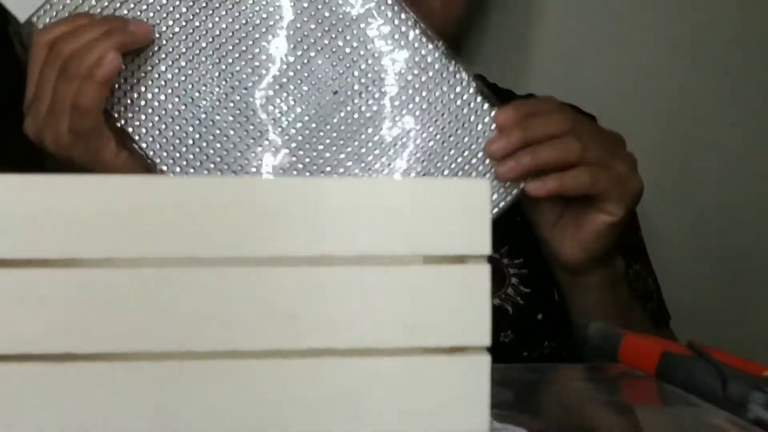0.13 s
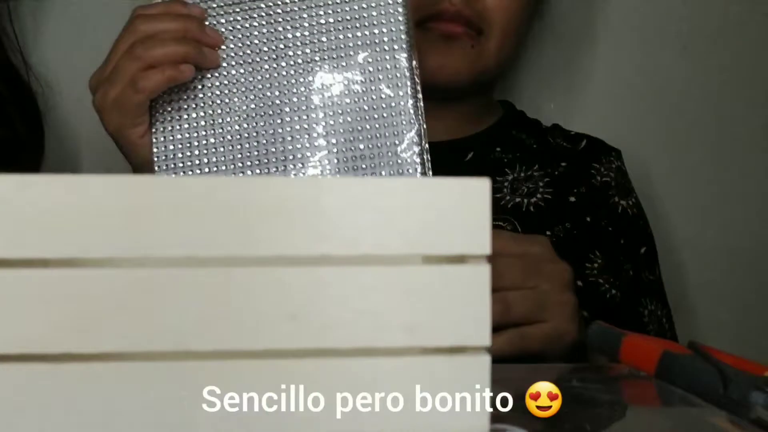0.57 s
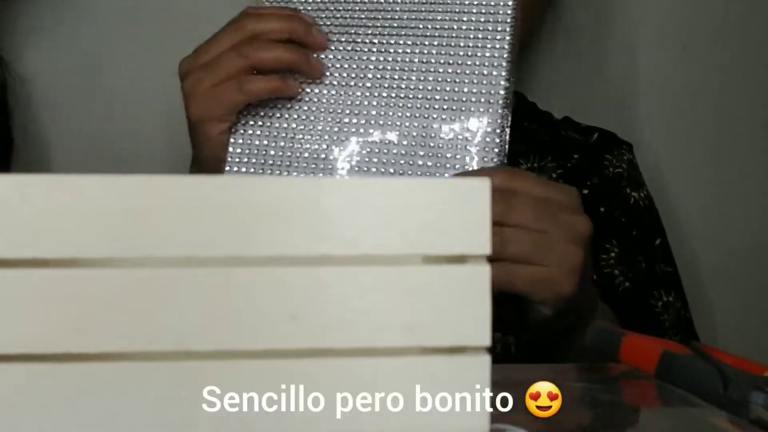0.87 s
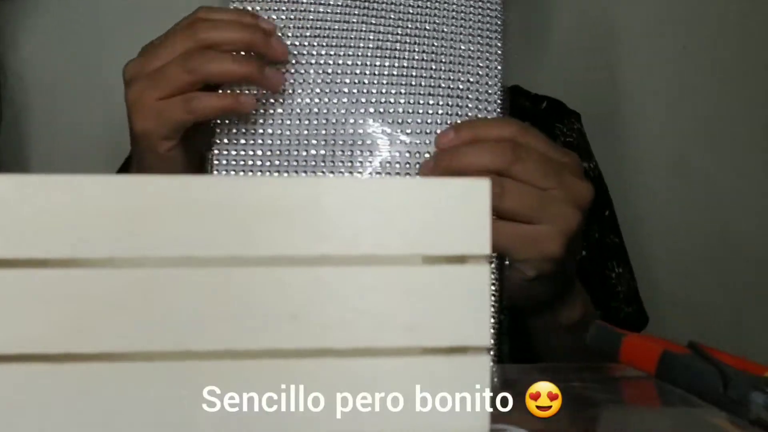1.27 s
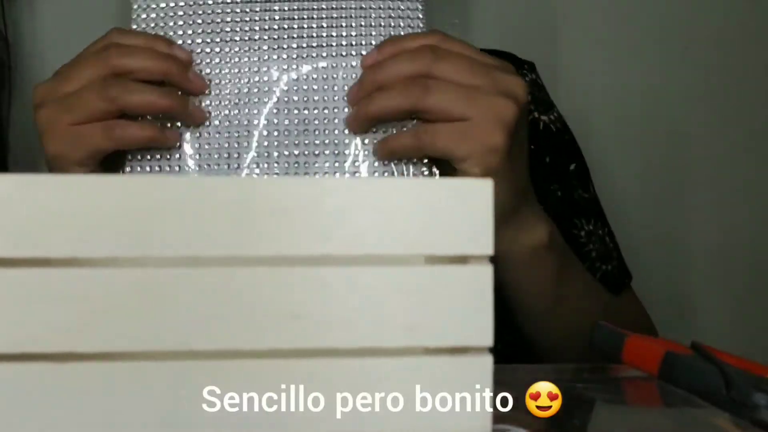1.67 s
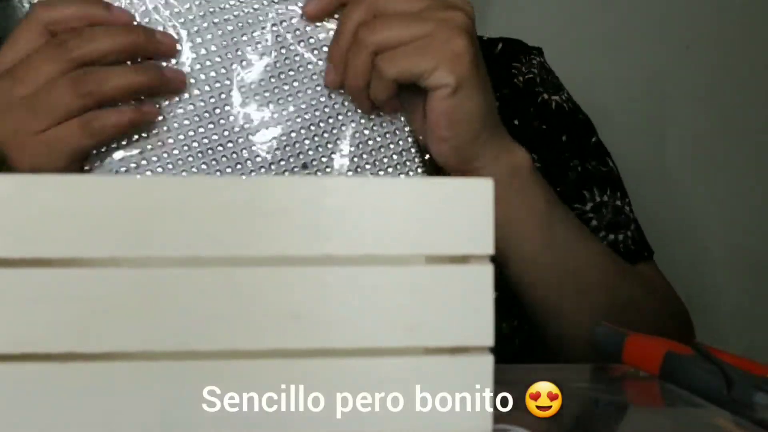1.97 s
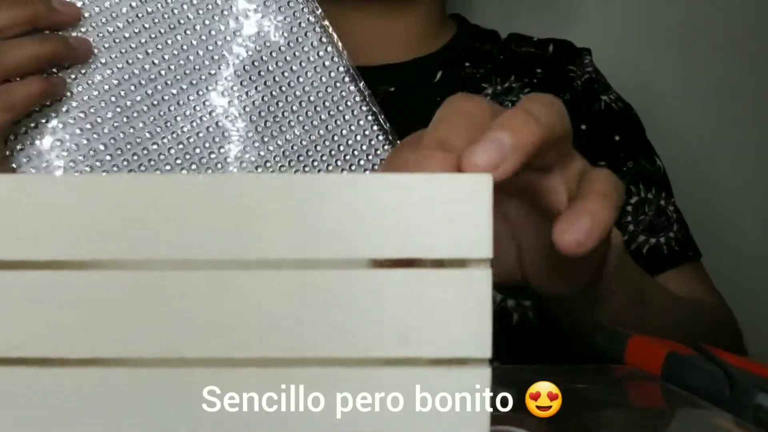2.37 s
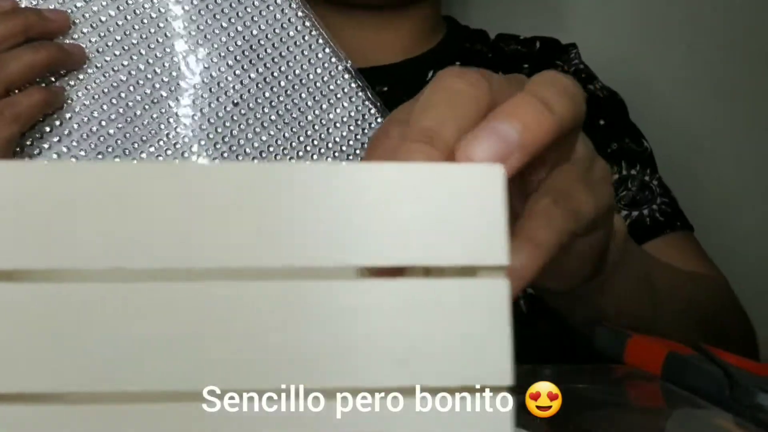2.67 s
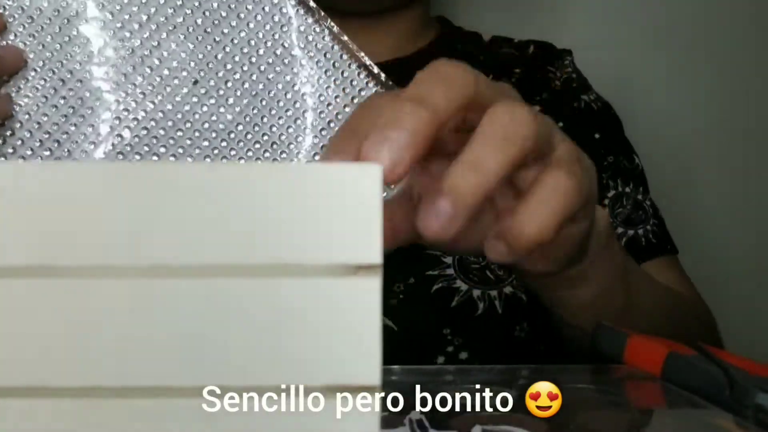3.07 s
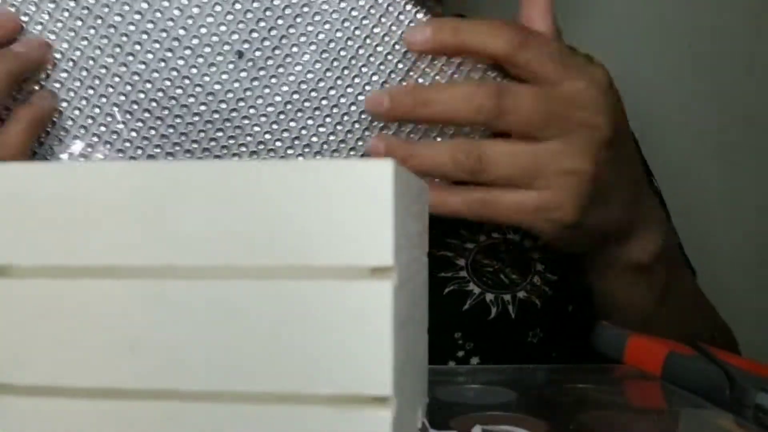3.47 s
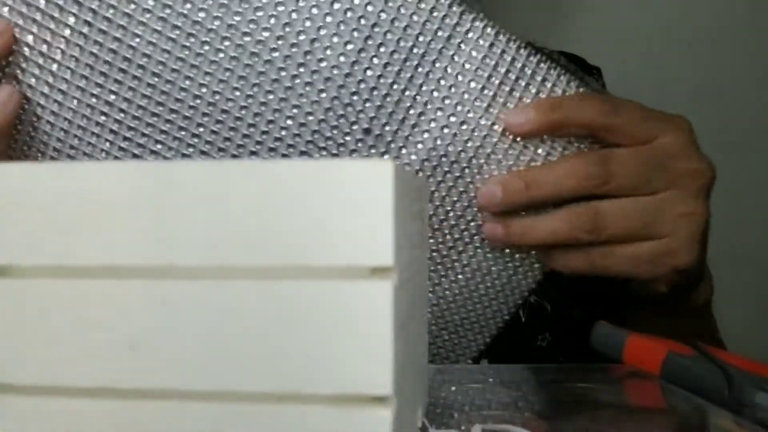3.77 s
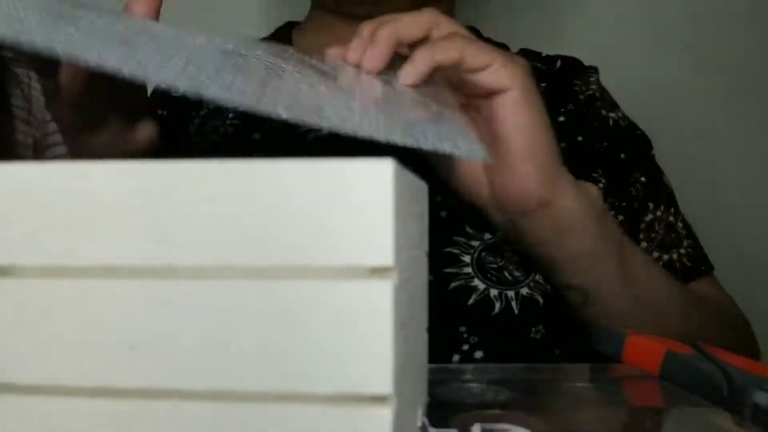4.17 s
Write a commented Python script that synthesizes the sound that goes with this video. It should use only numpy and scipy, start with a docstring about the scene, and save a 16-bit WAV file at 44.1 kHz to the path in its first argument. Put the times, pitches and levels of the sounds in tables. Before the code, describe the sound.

Thin plastic film crinkles and snaps in uneven flurries as a stiff sheet is flexed by hand, close to the microphone in a small room. Dull pops and soft rubbing run underneath. Fingers and sheet bump a wooden crate several times, with a louder double knock and brief faint squeaks around the middle. A denser run of sharp crackles follows, over a soft low rumble from the table.

```python
"""A stiff plastic mesh sheet in a thin film sleeve, turned and bent by hand behind a wooden crate.
The film snaps and crackles as creases flip; the sheet buckles with a pop, rustles and rubs the crate.
A finger or edge squeaks, fingers and sheet knock the crate, and the table under it carries a low
rumble to a nearby phone with two microphone ports, in a small room."""
import sys
import numpy as np
from scipy import signal
from scipy.fft import rfft, irfft, next_fast_len
from scipy.io import wavfile

SR = 44100
rng = np.random.default_rng(int(sys.argv[2]) if len(sys.argv) > 2 else 0)


def digitize_waveform(pressure):
    """Quantize a signal to 16-bit integers and store it at the path in sys.argv[1].

    Rows of a 2-D input are taken as channels; values are limited to [-1, 1].
    """
    field = np.atleast_2d(pressure).T
    bounded = np.clip(field, -1, 1)
    quanta = np.round(bounded * 32767).astype(np.int16)
    wavfile.write(sys.argv[1], SR, quanta)


N = 190239
TIME = np.arange(N) / SR


def amp(db):
    """Decibels to gain."""
    return 10 ** (np.asarray(db) / 20)


def unit(x):
    """Normalise to rms 1."""
    return x / np.sqrt(np.mean(x ** 2) + 1e-20)


def curve(points, hz):
    """Read breakpoints on a log frequency axis."""
    f, values = np.transpose(points)
    return np.interp(np.log(hz + 1), np.log(f + 1), values)


def pan(left_minus_right_db):
    """Left and right gains."""
    return amp(np.multiply.outer([.5, -.5], left_minus_right_db))


def filtered(x, response):
    """Apply a complex frequency response."""
    size = next_fast_len(N + SR // 2)
    return irfft(rfft(x, size) * response(np.fft.rfftfreq(size, 1 / SR)), size)[..., :N]


def eq(spectrum):
    """Minimum-phase EQ, so nothing rings ahead of a transient."""
    def response(hz):
        cepstrum = irfft(np.log(amp(curve(spectrum, hz)) + 1e-5))
        cepstrum[1:len(cepstrum) // 2] *= 2
        cepstrum[len(cepstrum) // 2 + 1:] = 0
        gain = np.exp(rfft(cepstrum))
        return gain / np.sqrt(np.mean(abs(gain) ** 2))
    return response


def bursts(triggers, t60):
    """Each trigger fires an envelope: instant attack, exponential decay."""
    return signal.lfilter([1], [1, -amp(-60 / (max(t60, 1e-4) * SR))], triggers)


def grains(per_s, spread_db, t60, bed):
    """Envelope of rms 1: random, uneven grains over a steady bed."""
    triggers = rng.random(N) < per_s / SR
    sizes = amp(spread_db * np.minimum(rng.exponential(size=N), 2.6))
    return unit(unit(bursts(triggers * sizes, t60)) + bed)


# Stereo image: f/Hz, left-right correlation
CORRELATION = [(60, 0.89), (300, 1), (700, 0.91), (2000, 0.31), (5000, 0.47), (12000, 0.7)]
def stereo_noise(envelope):
    """Shaped noise; the ports hear the lows alike and the highs less so."""
    width = lambda hz: np.arccos(np.clip(curve(CORRELATION, hz), 0, 1)) / 2
    mid, side = rng.standard_normal((2, N))
    mid = filtered(envelope * mid, lambda hz: np.cos(width(hz)))
    side = filtered(envelope * side, lambda hz: np.sin(width(hz)))
    return mid + side * [[1], [-1]]


# Hand moves: t/s, hold/s, film level/dB, sheet level/dB, rub level/dB
HAND_MOVES = [(0, 0.086, -56.5, -50, -51.5), (0.147, 0.13, -69.5, -59, -59.5), (0.39, 0.099, -72, -65, -72),
              (0.648, .24, -65, -58.5, -50), (0.925, 0.19, -62, -50.5, -58), (1.15, 0.27, -65, -52, -59),
              (1.42, 0.22, -72, -55.5, -54), (1.519, 0.11, -58, -52.5, -45.5),
              (1.651, 0.13, -60.5, -54.5, -56.5), (1.825, 0.15, -54.5, -49, -53.5),
              (1.946, 0.06, -52, -43.5, -49.5), (2.05, 0.085, -61.5, -61, -65),
              (2.218, 0.24, -64.5, -53.5, -47), (2.599, 0.059, -61, -56.5, -41.5),
              (2.697, 0.048, -67.5, -60, -53), (2.76, 0.031, -65, -54, -60),
              (2.847, .18, -86.5, -84, -56.5), (3.038, 0.16, -68.5, -58.5, -50),
              (3.33, 0.087, -57.5, -53, -53), (3.471, 0.092, -60, -52, -54.5),
              (3.562, 0.12, -46.5, -44.5, -49.5), (3.697, 0.039, -56, -49, -52),
              (3.794, 0.034, -67.5, -59.5, -54.5), (3.863, .06, -60, -54.5, -61),
              (3.93, 0.038, -64.5, -53.5, -62), (4.008, .05, -68, -64, -66),
              (4.077, 0.067, -47, -48, -53.5), (4.15, 0.27, -54, -51, -58)]
def hand_fader(layer, rest_db, attack_s=0.029, release_db_per_s=288):
    """One layer's gain: each move rises, holds and fades to the resting level."""
    start, hold, *levels = np.transpose(HAND_MOVES)[:, :, None]
    db = levels[("film", "sheet", "rub").index(layer)]
    rise = np.clip(1 + (TIME - start) / attack_s, 0, 1) ** 2
    moves = rise * amp(db - release_db_per_s * np.maximum(TIME - (start + hold), 0))
    return np.maximum(moves.max(axis=0), amp(rest_db))


# Big snaps: t/s, top-band level/dB, lower-band offset/dB
FILM_SNAPS = [(0.0162, -34, -7), (0.0257, -36, -15), (.0883, -55, 7), (0.1522, -48.5, -3), (.204, -51, -6),
              (0.2513, -42.5, -3.5), (.397, -44, -1), (0.4241, -43.5, 0), (0.769, -47.5, -2),
              (0.933, -45, -16), (.9395, -48, -11), (0.963, -34.5, -9.5), (1.001, -45, -1),
              (1.0387, -45, -3), (1.0793, -41.5, 5.5), (1.1858, -48, 0), (1.2984, -41.5, 4),
              (1.3507, -43, -2), (1.5267, -41.5, -2.5), (1.592, -32, -8.5), (1.601, -36, -14),
              (1.6626, -33, -5.5), (1.7049, -39, -4.5), (1.832, -42, -16), (1.8416, -37, -3),
              (1.9205, -43.5, 8), (1.941, -37.5, -8), (1.9732, -30.5, -7), (1.9974, -33.5, -6),
              (2.0495, -37.5, -4), (2.0914, -34, -5.5), (2.1126, -40, -4.5), (2.2085, -43, -4),
              (2.569, -47, -2), (2.606, -47.5, 14.5), (3.1379, -35.5, -2), (3.3216, -31.5, -15),
              (3.362, -43, 4), (3.415, -33, -2.5), (3.4249, -31.5, -2), (3.5614, -35, -21),
              (3.5707, -31, -7), (3.584, -29.5, -6), (3.5924, -35, -16), (3.619, -29.5, -9),
              (3.6473, -25.5, -8.5), (3.6552, -42, -6), (3.763, -44, -14), (3.866, -40.5, -10),
              (3.883, -34.5, -9), (3.9003, -24.5, -8), (3.909, -36, -6), (3.9382, -44, -5),
              (4.075, -38, -13), (4.0866, -26, -6.5), (4.0991, -22.5, -17), (4.1081, -31, -15),
              (4.176, -29, -22), (4.2185, -39, -6), (4.2443, -40, -20), (4.28, -40, -4),
              (4.2887, -32.5, -2.5), (4.304, -30.5, 0)]
# Bright film colour: f/Hz, level/dB
FILM_EQ = [(1290, -44), (2200, -2), (2550, -8), (2820, -6), (3040, -6.5), (4460, -9.5), (6060, -7),
           (7210, -10), (9890, -3), (15100, -9.5), (16200, -18)]
# Where the sleeved sheet is held: t/s, left minus right/dB
FILM_PAN = [(0, -5), (.5, -1.5), (1.27, -11.5), (1.54, -4.5), (2.198, -7), (3.9, -6), (4.05, -3.5),
            (4.31, -4.5)]
def film_crackle():
    """Creases flip in the thin film: big snaps on cue over a random fizz of small ones."""
    at, db, offset_db = np.transpose(FILM_SNAPS)
    ticks = np.zeros((2, N))
    ticks[:, np.round(at * SR).astype(int)] = amp([db, db + offset_db])
    highpass = lambda hz: 1 / (1 + (7000 / (hz + 1)) ** 6)
    top = filtered(stereo_noise(bursts(ticks[0], t60=0.013)), highpass)
    lower = filtered(stereo_noise(bursts(ticks[1], t60=0.014)), lambda hz: 1 - highpass(hz))
    fizz = hand_fader("film", rest_db=-77.5) * grains(320, spread_db=6, t60=.014, bed=.95)
    position = np.interp(TIME, *np.transpose(FILM_PAN))
    return filtered(top + lower + stereo_noise(fizz), eq(FILM_EQ)) * pan(position)


# Buckling pops: t/s, level/dB
SHEET_POPS = [(0.017, -34.5), (.058, -44), (.248, -47), (0.273, -43), (0.394, -32.5), (0.769, -35),
              (1, -53), (1.079, -25), (1.297, -41), (1.344, -36), (1.59, -30.5), (1.665, -33),
              (1.709, -26.5), (1.831, -30), (1.893, -34.5), (1.932, -26), (1.973, -28.5), (2.009, -26),
              (2.06, -32), (2.089, -30), (2.241, -27.5), (2.429, -35), (2.47, -35), (2.646, -23),
              (3.319, -32.5), (3.349, -29), (3.363, -27.5), (3.414, -28.5), (3.571, -32), (3.584, -22.5),
              (3.662, -23), (3.764, -32), (3.854, -33), (3.901, -28), (4.078, -26.5), (4.302, -25)]
# Duller sheet colour: f/Hz, level/dB
SHEET_EQ = [(210, -20.5), (350, -5), (413, -2.5), (512, 3), (556, -0.5), (734, 3.5), (969, 1), (2190, -7),
            (2560, -12), (3200, -21), (4160, -18), (7040, -120)]
def sheet_flex():
    """The stiff sheet pops as it buckles and rustles as it moves."""
    at, db = np.transpose(SHEET_POPS)
    triggers = np.zeros(N)
    triggers[np.round(at * SR).astype(int)] = amp(db)
    pops = bursts(triggers, t60=0.015) - bursts(triggers, t60=0.0057)  # rounded attack
    rustle = hand_fader("sheet", rest_db=-67) * grains(170, spread_db=17, t60=0.031, bed=1)
    return filtered(stereo_noise(rustle + pops), eq(SHEET_EQ)) * pan([-2.3])


# Wooden body, for rubs and knocks: f/Hz, level/dB, t60/s
CRATE_MODES = [(100, -10, .15), (138, 2, .15), (195, -2, .13), (230, -2, .13), (280, -3, .12),
               (345, -5, .11), (430, 0, .12), (560, -1, .1), (700, -4, .08), (820, -3, .08), (980, -5, .07),
               (1130, -7, .06), (1400, -7, .05), (1700, -9, .045), (2090, -10, .045)]
def crate_rub():
    """The sheet drags on the crate; grainy friction drives its low modes."""
    def body(hz):
        wood = sum(amp(db) * 1j * hz * (2.2 / t60) / (f * f - hz * hz + 1j * hz * 9 / t60)
                   for f, db, t60 in CRATE_MODES)
        return wood / (1 + (hz / 600) ** 4) / (1 + (95 / (hz + 1)) ** 4)
    friction = stereo_noise(grains(100, spread_db=7.5, t60=0.086, bed=0.65))
    return hand_fader("rub", rest_db=-69.5) * unit(filtered(friction, body)) * pan([-2.3])


# Noise floor colour: f/Hz, level/dB
FLOOR_EQ = [(35, -28), (60, -5), (294, -2), (437, -27), (607, -57), (968, -12), (1200, -20), (1380, -20),
            (3760, -44), (13300, 2), (16000, -1)]
def noise_floor():
    """A steady bed of room tone and microphone hiss."""
    return amp(-71.5) * unit(filtered(stereo_noise(np.ones(N)), eq(FLOOR_EQ))) * pan([-2.1])


# Table jolts: t/s, level/dB
TABLE_JOLTS = [(.15, -37.5), (.69, -47), (.9, -55), (1.1, -50.5), (1.249, -43.5), (1.55, -40),
               (2.019, -41.5), (2.26, -34), (2.34, -50), (2.66, -41.5), (2.79, -49), (3.049, -41),
               (3.3, -48), (3.42, -46), (3.589, -36), (3.75, -40.5), (3.86, -47.5), (4.02, -61),
               (4.09, -42), (4.25, -51)]
# Low end of the table: f/Hz, level/dB
RUMBLE_EQ = [(13, -38), (22, 1), (40, -30), (54, 10.5), (70, -4), (120, -10), (160, -17.5), (260, -120)]
def table_rumble(steady_db=-57, jolt_half_s=0.034):
    """The table top carries a rumble that swells at each jolt."""
    at, db = np.transpose(TABLE_JOLTS)[:, :, None]
    jolts = amp(db) * np.exp(-((TIME - at) / jolt_half_s) ** 2)
    rumble = unit(filtered(stereo_noise(np.ones(N)), eq(RUMBLE_EQ)))
    return (amp(steady_db) + jolts.sum(axis=0)) * rumble * pan([-1.2])


# Squeak cues: t/s, half length/s, level/dB, centre f/Hz, roll-off/(dB per octave)
SQUEAKS = [(0.348, 0.011, -58, 3150, 35), (2.301, 0.012, -46.5, 1650, 12.5), (2.326, 0.016, -59, 1650, 20),
           (2.376, 0.078, -56.5, 2200, 31), (2.395, 0.049, -61, 1350, 21), (2.703, 0.026, -47, 2000, 30),
           (2.774, 0.021, -47.5, 1820, 19), (3.041, 0.01, -57.5, 2500, -2.5),
           (3.053, 0.0077, -48, 1600, 15), (3.115, 0.036, -54.5, 1620, 10)]
# Squeak resonances: f/Hz, width/Hz, level/dB
SQUEAK_MODES = [(1390, 80, -3.5), (1654, 220, -1.5), (2040, 380, -5), (3200, 220, -3.5), (5130, 150, -8.5),
                (7440, 280, -11), (9370, 500, -4), (12400, 1700, -4.5)]
def squeaks():
    """A finger or edge slips unevenly, ringing a few resonances in brief swells."""
    at, half_s, db, centre_hz, rolloff = np.transpose(SQUEAKS)[:, :, None]
    swells = amp(db) * np.exp(-((TIME - at) / half_s) ** 2)
    slips = stereo_noise(grains(660, spread_db=3.5, t60=0.001, bed=0.29))
    out = 0
    for f, width, mode_db in SQUEAK_MODES:
        resonance = lambda hz: (1j * hz * width / (f * f - hz * hz + 1j * hz * width)) ** 2
        weight = amp(mode_db - rolloff * abs(np.log2(f / centre_hz)))
        out = out + unit(filtered(slips, resonance)) * (swells * weight).sum(axis=0)
    return out * pan([-5])


# Knock cues: t/s, level/dB, centre f/Hz, roll-off/(dB per octave), decay rate factor
CRATE_KNOCKS = [(0.698, -36, 434, 9.5, 0.96), (0.767, -32.5, 295, 32, 1), (0.845, -27.5, 288, 10, 1.1),
                (1.076, -38.5, 785, 7, 1.6), (1.11, -52, 135, 27, 0.42), (1.24, -40.5, 135, 7, 0.85),
                (1.375, -26.5, 550, 20, 1.3), (1.3814, -18.5, 136, 5, 0.67), (1.411, -27.5, 427, 8, 1.8),
                (1.507, -32.5, 135, 20, 0.49), (1.598, -31, 418, 35, 1), (1.619, -37, 420, 20, 1.06),
                (2.238, -35.5, 384, 4.5, 0.6), (2.325, -20.5, 334, 7, 4.2), (2.44, -19, 307, 10.5, 1.53),
                (2.466, -41, 350, 15, 0.86), (2.5672, -17, 630, 8.5, 2.85), (2.6052, -10.5, 436, 1.5, 2.9),
                (2.61, -31.5, 432, 17, 2.6), (2.649, -29, 298, 15, 2.4), (2.999, -35.5, 338, 18, 1.2),
                (3.1448, -19.5, 258, 2.5, 2.28), (3.585, -30, 110, 5, 2), (3.749, -39, 420, 27, 3.3)]
def crate_knocks(attack_s=0.00048):
    """Each knock favours the modes near its centre pitch; a resting hand damps them."""
    out = np.zeros((2, N + SR))
    t = np.arange(SR // 3) / SR
    hz, mode_db, t60 = np.transpose(CRATE_MODES)[:, :, None]
    for at, db, centre_hz, rolloff, damping in CRATE_KNOCKS:
        octaves = np.log2(hz / centre_hz)
        drive_db = mode_db - rolloff * abs(octaves) - 4 * np.maximum(-octaves, 0)
        drive_db += rng.normal(0, 2.3, hz.shape)
        phase = rng.normal(0, 1, (2, len(hz), 1)) * np.clip(hz / 1800, .05, .8)  # highs sound wider
        age = np.maximum(t - 0.00083 * rng.random(hz.shape), 0)  # the blow spreads through the slats
        envelope = amp(drive_db - 60 * age * damping / t60) * (1 - np.exp(-age / attack_s))
        ring = (envelope * np.sin(2 * np.pi * hz * age + phase)).sum(axis=1)
        out[:, round(at * SR):][:, :len(t)] += amp(db) * ring / abs(ring).max()
    soft_fingertip = lambda f: 1 / (1 + 1j * f / 2300 * 0.51 - (f / 2300) ** 2) ** 2  # low-pass
    return filtered(out[:, :N], soft_fingertip) * pan([-2.8])


# Reverb time: f/Hz, t60/s
ROOM_DECAY = [(150, 0.07), (1000, 0.13), (4000, 0.16), (14000, 0.15)]
def room_reverb(x):
    """A short, small-room tail; each band dies at its own speed."""
    hz, t, noise = signal.stft(rng.standard_normal((2, SR // 2)), SR, nperseg=256)
    decay = amp(-60 * t / curve(ROOM_DECAY, hz)[:, None])
    tail = signal.istft(noise * decay, SR, nperseg=256)[1]
    predelayed = np.pad(x.mean(axis=0), (200, 0))[None]
    return signal.fftconvolve(predelayed, tail / np.linalg.norm(tail[0]), axes=1)[:, :N]


def scene():
    """The mix: close handling with reverb, over noise floor and rumble."""
    close = film_crackle() + sheet_flex() + crate_rub() + squeaks() + crate_knocks()
    wet = amp(-5.5) * room_reverb(close) * pan([-2.5])
    return close + wet + noise_floor() + table_rumble()


# Phase lead of the left port: f/Hz, phase/rad
PORT_PHASE = [(1400, 0), (2200, -2), (3600, -4.5), (5000, -2 * np.pi)]
def record(dry):
    """The phone's ports differ in phase through the mids; sub-bass and extreme top are cut."""
    low_cut_hz, high_cut_hz = 42, 15900
    def response(hz):
        ports = np.exp(1j * curve(PORT_PHASE, hz) * [[1], [0]])
        low_cut = (1j * hz / (1j * hz + low_cut_hz)) ** 3
        return ports * low_cut / (1 + (hz / high_cut_hz) ** 160)
    return filtered(dry, response)


dry = scene()
out = record(dry)
digitize_waveform(out)
```